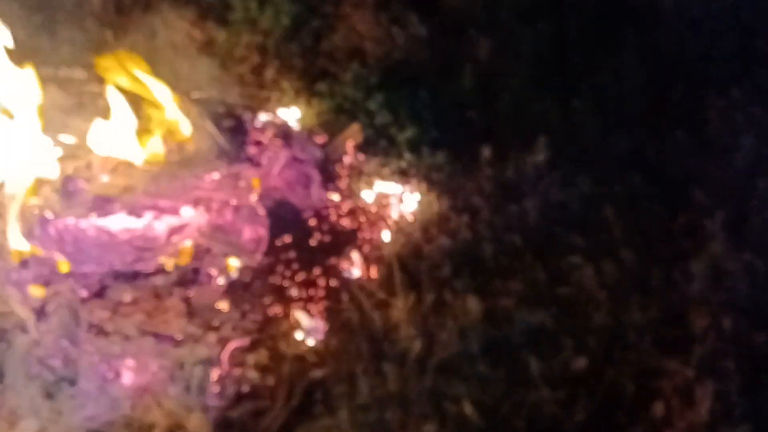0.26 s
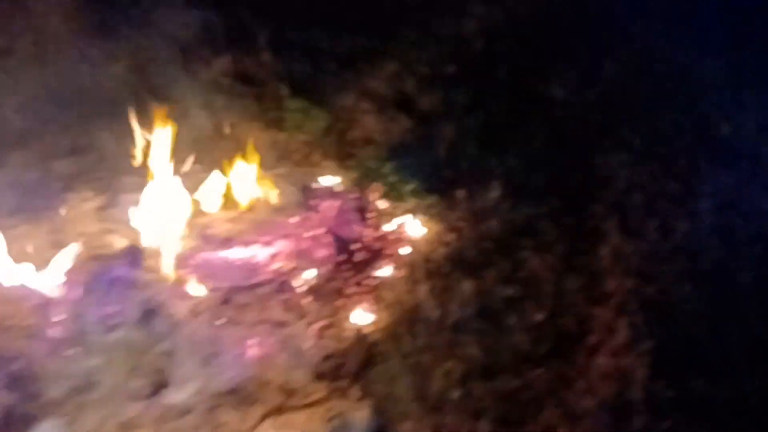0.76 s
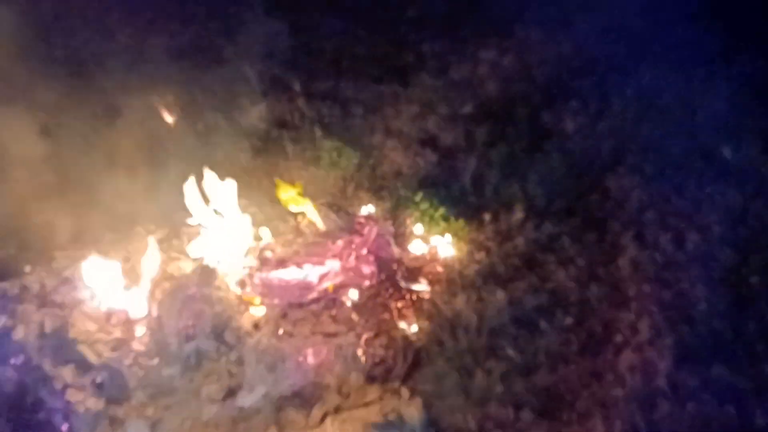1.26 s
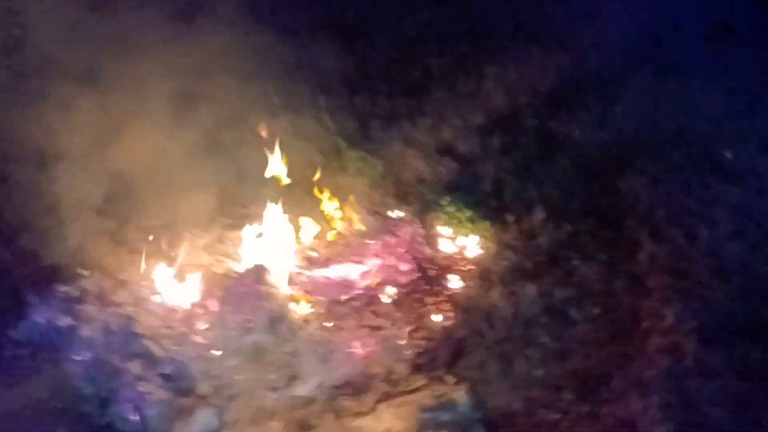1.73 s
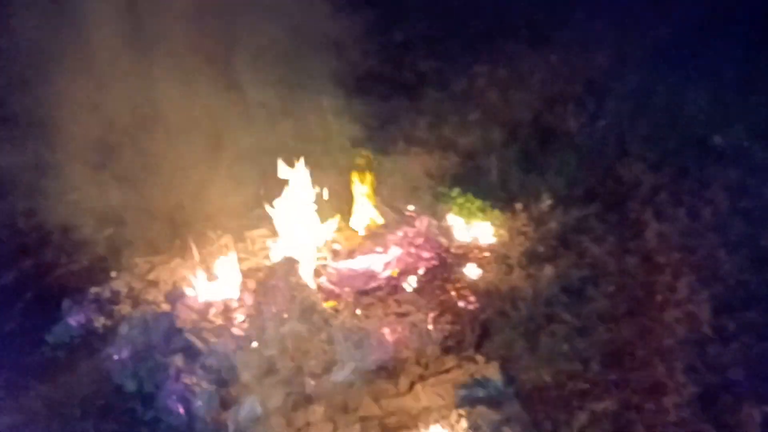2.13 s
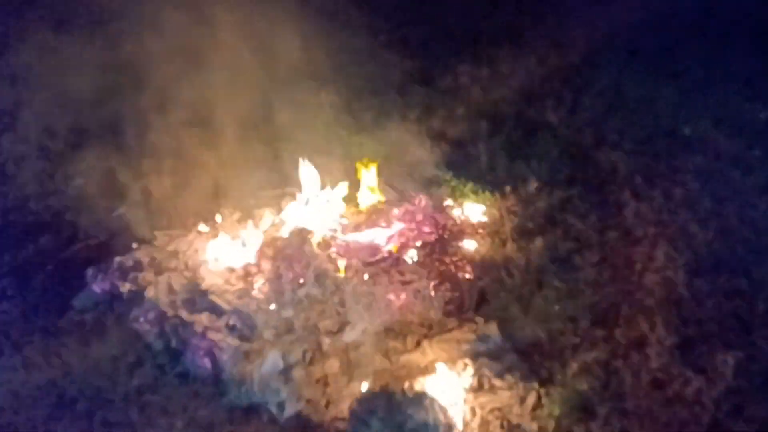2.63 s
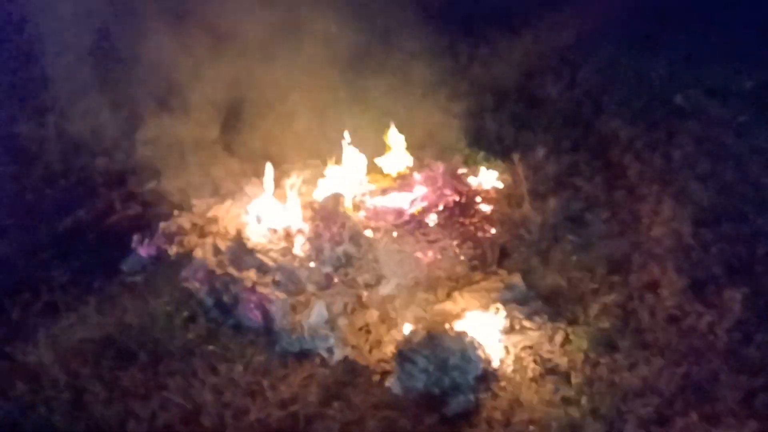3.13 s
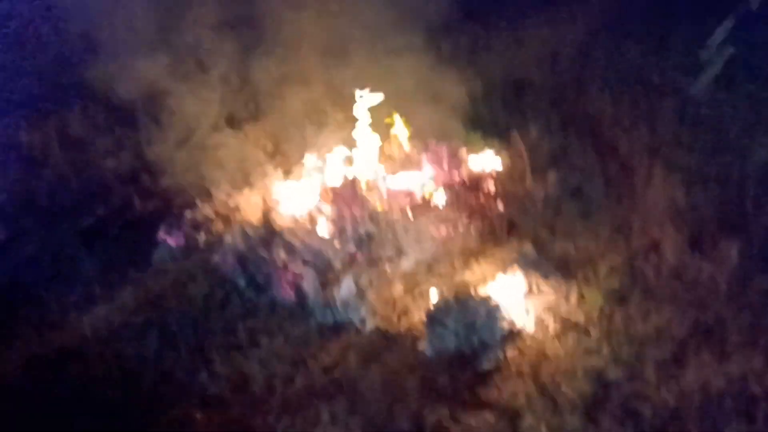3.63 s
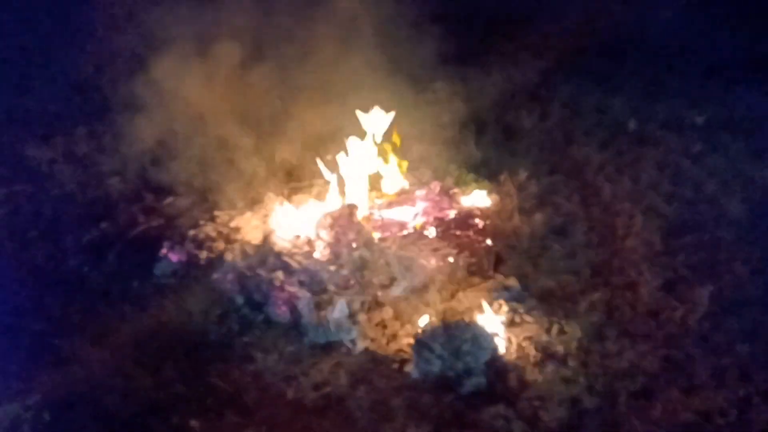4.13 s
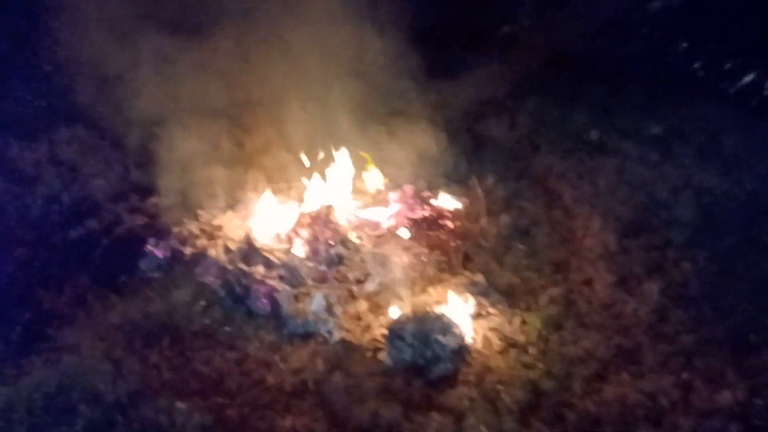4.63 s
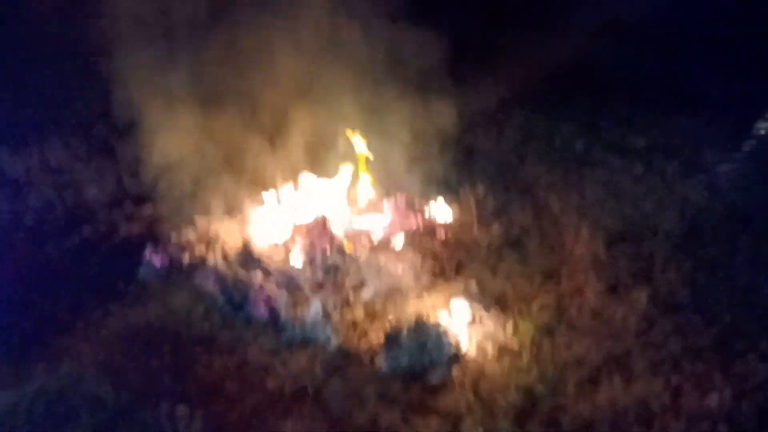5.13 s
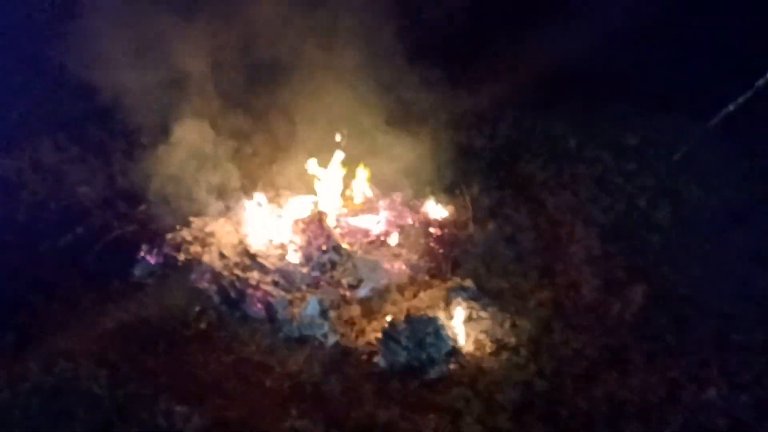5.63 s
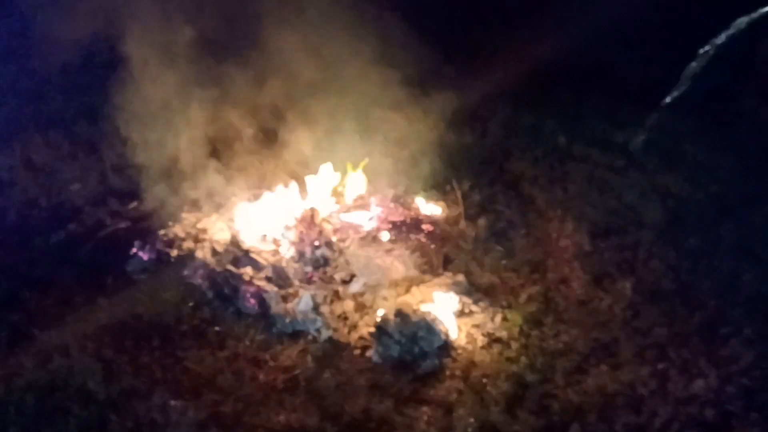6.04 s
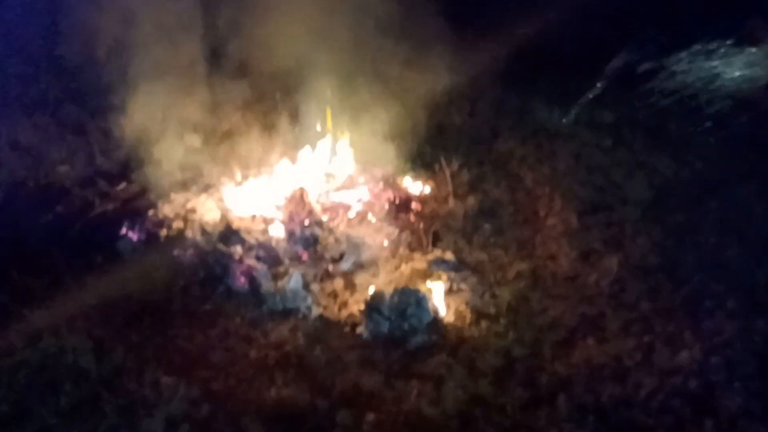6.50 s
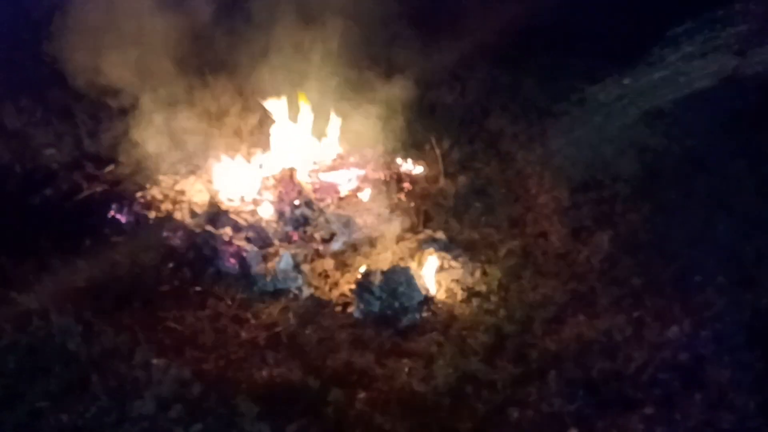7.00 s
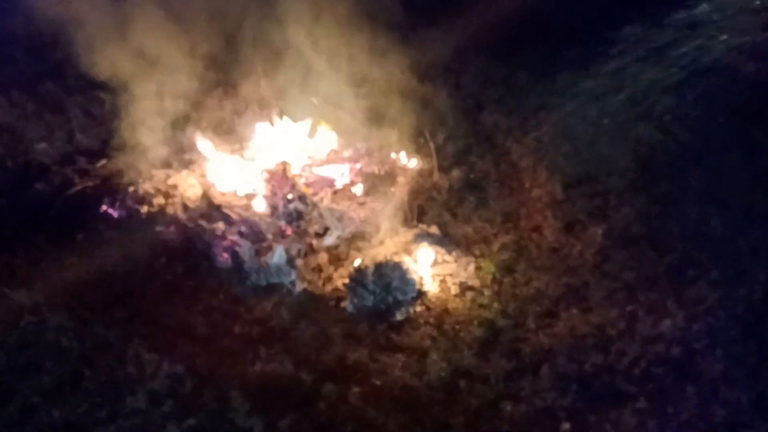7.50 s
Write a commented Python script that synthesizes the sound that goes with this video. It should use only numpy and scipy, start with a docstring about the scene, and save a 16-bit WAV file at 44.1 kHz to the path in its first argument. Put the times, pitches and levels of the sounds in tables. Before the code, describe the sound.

Steam hisses and sputters on a crackling fire of paper and dry grass, over low rushing flames and a far-off engine throb.

```python
"""A heap of paper, cardboard and dry grass burns outdoors at night while hose water sizzles on its edge.
From the start, steam hisses in bursts, mostly right of a moving two-port microphone, over the rush of
the flames; far off, exhaust pulses ring a big engine's pipe and a frog peeps. After a second, pops and
snapping stalks crowd in. Near 3 s a distant vehicle speeds up. Then the pops thin out, the sizzle drifts
toward the centre and more frogs peep, until the vehicle slows and the big engine fades away."""
import sys
import numpy as np
from scipy import signal
from scipy.fft import rfft, irfft
from scipy.io import wavfile
from scipy.ndimage import uniform_filter1d

SR = 44100
rng = np.random.default_rng(int(sys.argv[2]) if len(sys.argv) > 2 else 0)


def log_audio(samples):
    """Write samples as a 16-bit WAV file to the path given in sys.argv[1]."""
    # one column per channel
    frames = np.atleast_2d(samples).T
    # limit to full scale, then quantise
    limited = np.clip(frames, -1, 1)
    pcm = np.round(limited * 32767).astype(np.int16)
    wavfile.write(sys.argv[1], SR, pcm)


N = 342216

# Spectrum of the steam hiss and of the pops' crisp top: frequency_hz, density_db
FIZZ = [(350, 0), (700, -2), (1060, -2), (1500, 1), (2220, -1), (3360, -1), (3810, -1), (4700, 0.5),
        (5600, -2), (6600, -4.5), (8000, -2.5), (10000, -0.5), (12600, 5.5), (15100, -3), (16800, -4)]


def amp(db):
    """Decibels as an amplitude ratio."""
    return 10 ** (np.asarray(db) / 20)


def unit_rms(x):
    """Normalisation to a mean power of one."""
    return x / np.sqrt(np.mean(abs(x) ** 2) + 1e-20)


def at_hz(points, hz):
    """Interpolation on a logarithmic frequency axis."""
    knots_hz, value = np.transpose(points)
    return np.interp(np.log(hz + 1), np.log(knots_hz + 1), value)


def curves(rows, t):
    """Linear interpolation of each column over time."""
    time_s, *columns = np.transpose(rows)
    return [np.interp(t, time_s, column) for column in columns]


def add(mix, start_s, sound):
    """Superposition of a sound on the mix."""
    part = mix[:, round(start_s * SR):][:, :sound.shape[1]]
    part += sound[:, :part.shape[1]]


def resonate(x, hz, width_hz):
    """Resonance of unit gain by heterodyning: shift hz down to zero, smooth, shift back."""
    carrier = np.exp(2j * np.pi * np.cumsum(hz * np.ones(len(x))) / SR)
    pole = np.exp(-np.pi * width_hz / SR)
    return 2 * (carrier * signal.lfilter([1 - pole], [1, -pole], x / carrier + 1e-18)).real


def ports(near, other, hz, gap_db, late_ms, focus=1):
    """Acoustic shadow and path difference: the left port is shaded, delayed and partly coherent."""
    shadow = [(300, .01), (1300, 0.11), (2400, 0.23), (4400, 0.6), (8000, 0.79), (15000, 1.8)]  # weight of the left-minus-right gap: frequency_hz, weight
    coherence = [(500, .85), (1500, 1), (4000, 1), (8000, .97), (14000, .93)]  # likeness of the aligned ports: frequency_hz, coherence
    alike = np.clip(focus * at_hz(coherence, hz), 0, 1)
    left_gain = amp(gap_db * at_hz(shadow, hz))
    delayed = near * np.exp(-2j * np.pi * hz * late_ms / 1000)
    left = left_gain * (alike * delayed + np.sqrt(1 - alike ** 2) * other)
    return np.array([left, near]) * 2 / np.sqrt(1 + left_gain ** 2)


def sizzle():
    """Amplitude-modulated noise: steam hisses in puffs while stalks crackle and dry grass ticks."""
    # Hiss between bursts: time_s, level_db, body_db, edge_db (the last two before weighting)
    hiss = [(0.0, -58, -2, 5), (.06, -54.5, -1, 9), (.3, -51.5, -3, -8), (.85, -54.5, -2, 13),
            (1.3, -49, 2, -6.5), (1.55, -49.5, 1, -18), (2.0, -47, -6, 3), (2.45, -41.5, -2, -13.5),
            (2.65, -47.5, -1.5, -24.5), (3.3, -47.5, -2.5, 1.5), (3.6, -54, 2, -13.5),
            (3.9, -56.5, -2, -10), (4.1, -56, -5.5, -13), (4.4, -57.5, -7, -7), (4.75, -52, 0.5, -1.5),
            (5.38, -57, -14.5, 5), (5.9, -54.5, -8.5, 45), (6.3, -53, -12, 31), (6.7, -56, -10, 25),
            (6.95, -51.5, 3.5, -16), (7.2, -53, -10.5, -2), (7.76, -52, -4.5, 2)]
    body_weight = [(700, 1.5), (1200, 2.04), (2800, 0.84), (4500, 0.0048)]  # reach of the midrange lift: frequency_hz, weight
    edge_weight = [(2800, 0.33), (4500, 0.17), (6000, 0.092), (9000, 0.0082)]  # reach of the lift that extends into the treble: frequency_hz, weight
    # Direction of the hiss, drifting and at times jumping as another source takes over:
    # time_s, left_delay_ms, treble_gap_db (left minus right), focus
    direction = [(0, .57, -27, .5), (.09, .55, -28, .4), (.1, -.075, 4, 1), (.15, -.07, -2, .8),
                 (.17, .33, -18, .4), (.7, .33, -16, .45), (.95, .33, -14, .7), (1.25, .35, -13, .75),
                 (1.4, .36, -13, .35), (1.6, .41, -13, .75), (2.2, .49, -11.5, .9), (2.9, .35, -6.5, .7),
                 (3.1, .38, -4.5, .9), (3.44, .29, -8, .3), (3.8, .15, -5, .6), (4.5, .15, -6.5, .7),
                 (4.64, .1, -4, .3), (4.68, .03, -1, .6), (4.86, .03, -1, .5), (4.94, .21, -4.5, .8),
                 (5.35, .2, -4, .85), (5.55, .165, -4, .95), (5.95, .155, -3, .92), (6.2, .14, -3, .8),
                 (6.6, .092, -2.5, .85), (6.78, .11, -4, .7), (6.9, .11, -4, .3), (6.92, .39, -4.5, .35),
                 (7.76, .38, -4.5, .5)]
    long_puffs = sputter(per_s=16, spread_db=-5, t60_s=.84, rise_s=.00027)
    short_puffs = sputter(per_s=250, spread_db=1, t60_s=.0071, rise_s=.00078)
    puffs = unit_rms(.53 + .43 * long_puffs + .47 * short_puffs)
    noise = rng.standard_normal((2, N))
    ticks = impulses(per_s=400, spread_db=3.4, limit=2) * np.sign(noise)
    tick_band = signal.butter(1, [2000, 13000], "band", fs=SR, output="sos")
    source = amp(-9.5) * puffs * unit_rms(signal.sosfilt(tick_band, ticks))
    for band_hz in [(300, 1800), (1800, 3400), (3400, 6000), (6000, 10000), (10000, 20000)]:
        register = signal.sosfiltfilt(signal.butter(2, band_hz, "band", fs=SR, output="sos"), noise)
        crackle = sputter(per_s=240, spread_db=3.8, t60_s=.0055, rise_s=.00068)
        source += register * (puffs + amp(-13.5) * crackle)
    hz, t, (near, other) = signal.stft(unit_rms(source), SR, nperseg=256, noverlap=192)
    hz = hz[:, None]
    level_db, body_db, edge_db = curves(hiss, t)
    late_ms, gap_db, focus = curves(direction, t)
    burst_db, extra_body_db = steam_bursts(t)
    flicker_db = 1.53 * patches(rng.standard_normal(near.T.shape).T, bins=8, frames=14)
    colour = amp(at_hz(FIZZ, hz))
    colour /= np.sqrt(np.mean(colour ** 2 * (hz > 7000)))  # normalised by its treble
    lift_db = at_hz(body_weight, hz) * (body_db + extra_body_db) + at_hz(edge_weight, hz) * edge_db
    gain = colour * amp(level_db + burst_db + lift_db + flicker_db)
    pair = gain * ports(near, other, hz, gap_db, late_ms, focus)
    return signal.istft(pair, SR, nperseg=256, noverlap=192)[1][:, :N]


def steam_bursts(t):
    """Flash boiling on embers: gain and body lift as the hiss chokes, leaps, holds and falls."""
    # Water landing on embers: start_s, length_s, gain_db, body_db (before weighting), choke_db
    landings = [(0.083, 0.056, 2, 4, 3), (0.254, 0.029, -3, -6, 6), (0.47, 0.26, 4, 2.5, 1),
                (0.542, 0.032, -0.5, 2.5, -1), (0.605, 0.026, 4, 1, 1), (0.641, 0.04, -0.5, 2, -2),
                (0.93, 0.045, 5.5, -0.5, 0), (1.09, 0.2, 3, 0.5, -1), (1.329, 0.32, 1.5, -0.5, 3),
                (1.335, 0.079, 0.5, 1, 0.5), (1.461, 0.018, 6.5, 0.5, -5.5), (1.556, 0.014, -5.5, 1, 8),
                (1.585, 0.037, 4.5, -2.5, 5), (1.645, 0.1, 8, 1.5, 6), (1.795, 0.081, 5.5, 3.5, -6),
                (1.896, 0.28, 5.5, 3.5, -1), (2.19, 0.089, 0, 0, 3), (2.283, 0.026, 4.5, 1, -0.5),
                (2.335, 0.056, 5, 2.5, 8), (2.471, 0.086, 6, 3.5, 1.5), (2.619, 0.022, 0.5, 2.5, 9),
                (2.701, 0.038, 8.5, 3, 2.5), (2.878, 0.2, 5.5, -1, -1), (3.083, 0.094, 4, 4, -1),
                (3.181, 0.02, 2, 1.5, 5), (3.455, 0.073, 6, 0, -3), (3.658, 0.077, 3.5, 2.5, -2),
                (3.79, 0.023, 4.5, 0, -2), (3.972, 0.094, 3.5, 4, -6), (4.49, 0.085, -2, 5, -4.5),
                (4.611, 0.013, 3, 0, 8), (4.671, 0.0067, 1.5, 2, -1), (4.711, 0.026, -6, -3, 9),
                (4.762, .012, -5, -7, 2), (4.818, 0.075, 4, -3, 3), (4.929, 0.024, 2.5, 4, 1),
                (4.984, 0.2, 3.5, 4, 2), (5.317, 0.018, -1.5, -2, 6), (5.501, 0.2, 4, 1, 1),
                (5.767, 0.062, 1, 4, 0), (6.036, 0.078, 3, 3, -1), (6.417, 0.27, 3, 5, -4),
                (6.458, 0.11, 2.5, -2, -3), (6.541, 0.13, 2.5, 3, -3), (6.727, 0.098, 3.5, 3, 3),
                (6.95, .06, -0.5, 0, -1), (7.64, 0.11, 0.5, 1, -1)]
    rise_s, fall_s, choke_s = .0024, .047, .014
    start_s, length_s, gain_db, body_db, choke_db = np.transpose(landings)[:, :, None]
    age_s = t - start_s
    envelope = np.clip(np.minimum(age_s / rise_s, 1 + (length_s - age_s) / fall_s), 0, 1)
    choke = np.clip(3 * (age_s + choke_s) / choke_s, 0, 1) * np.clip(1 - age_s / rise_s, 0, 1)
    return (gain_db * envelope - choke_db * choke).sum(0), (body_db * envelope).sum(0)


def impulses(per_s, spread_db, limit):
    """Poisson process: impulses at random times, with random levels up to limit times the spread."""
    return amp(spread_db * np.minimum(rng.exponential(1, N), limit)) * (rng.random(N) < per_s / SR)


def sputter(per_s, spread_db, t60_s, rise_s):
    """Shot noise as an envelope: random puffs swell and decay exponentially."""
    kicks = impulses(per_s, spread_db, limit=3.6)
    swelling = signal.lfilter([1], [1, -np.exp(-1 / rise_s / SR)], kicks)
    return unit_rms(signal.lfilter([1], [1, -amp(-60 / t60_s / SR)], swelling))


def patches(noise, bins, frames):
    """Correlated fluctuation: a moving average of noise over frequency and time."""
    return unit_rms(uniform_filter1d(uniform_filter1d(noise, bins, axis=0), frames, axis=1))


def pops():
    """Damped resonance: a brief noise burst drives one mode and adds a crisp top; loud pops also thud."""
    # Pops in the heap: time_s, peak_db, ring_hz, treble_gap_db (left minus right)
    events = [(.103, -32, 1910, -2), (0.1122, -24, 2400, 5), (0.119, -23, 2720, 5), (0.136, -39, 1500, -2),
              (0.152, -29, 7540, -1), (.2711, -32, 6120, -28), (0.363, -36, 11670, -21),
              (.5055, -33, 3180, -11), (0.804, -26, 4000, -21), (.942, -32, 2640, -18),
              (1.115, -25, 4250, -18.5), (1.14, -23.5, 12000, -10.5), (1.161, -26, 1620, -15.5),
              (1.181, -28, 1260, -15), (1.1993, -24.5, 13400, -10), (1.216, -31, 11500, -5),
              (1.228, -26, 12000, -13), (1.3422, -37, 4700, -20), (1.3612, -22, 11000, -25),
              (1.485, -22.5, 12000, -17), (1.5598, -29, 13610, -17), (1.5944, -46, 5000, -14),
              (1.65, -36, 4790, -12), (1.676, -28, 3800, -6), (1.713, -23, 12620, 2.5),
              (1.714, -20.5, 4460, -5), (1.8162, -26, 2800, -15), (1.823, -23, 10770, -12),
              (1.831, -22, 4500, -15), (1.861, -24, 6000, -13), (1.896, -18, 14000, -26),
              (1.952, -29, 4200, -8), (1.99, -25, 3000, -17), (2.006, -26, 2750, -19),
              (2.015, -27, 7500, -14), (2.0339, -24.5, 1270, -2), (2.0503, -22.5, 7000, -12.5),
              (2.0684, -34, 800, -20), (2.06, -37, 3500, -14), (2.077, -21.5, 2630, -19),
              (2.085, -22.5, 3300, -20), (2.1214, -31, 2520, -20), (2.1292, -22.5, 4500, -21),
              (2.171, -22, 4930, -19), (2.179, -16, 12900, -8), (2.2294, -28, 7500, -10),
              (2.2441, -27, 6000, -6), (2.279, -30, 3000, -8), (2.295, -26, 2800, -5),
              (2.311, -22.5, 2280, -20), (2.3394, -25, 11000, -16), (2.382, -11, 4400, -15),
              (2.4865, -27, 5200, -9), (2.5152, -24, 5000, -20), (2.5213, -20, 12500, -23),
              (2.5317, -23, 6500, -15), (2.5322, -22, 1650, -21), (2.551, -14.5, 2000, -20.5),
              (2.566, -29, 7250, -23), (2.628, -21, 15000, -7.5), (2.6398, -30, 3500, -5.5),
              (2.7046, -35, 2000, -5.5), (2.783, -22.5, 7800, -4.5), (2.9428, -27.5, 4500, -2.5),
              (2.985, -21, 12000, -6), (3.022, -38, 2800, 1), (3.1224, -22, 13570, -8),
              (3.138, -29, 12000, -6), (3.148, -25, 12000, -3), (3.1556, -22, 4700, -2.5),
              (3.1843, -25, 11540, -7), (3.2, -23, 5560, -2), (3.204, -31, 4540, 10),
              (3.4333, -6.5, 13600, -16), (3.4355, -34.5, 643, -11), (3.4353, -36, 2140, -7),
              (3.802, -41.5, 3500, -7), (3.8182, -32.5, 13300, -16), (4.5248, -32.5, 580, -4),
              (4.631, -34, 2200, -7.5), (4.7654, -34, 5100, 6), (4.76, -32, 6150, 0),
              (4.7926, -26, 6640, 10.5), (4.89, -37, 586, -3), (4.913, -35, 2290, -5.5),
              (4.9944, -42, 9000, -10), (5.025, -29.5, 4200, -8.5), (5.0528, -37, 3500, 3.5),
              (5.2063, -38, 2500, -8), (5.2362, -31.5, 4310, -7), (5.3278, -30, 11460, -7),
              (5.399, -34, 7000, -8), (5.7704, -46, 3200, -1), (5.7831, -45, 2200, -11),
              (5.816, -31, 2120, -5), (5.823, -32, 2060, -2.5), (5.8492, -32, 13000, -23),
              (5.913, -37, 3000, -4), (5.9328, -42, 2790, 2), (5.9436, -34, 4900, -1.5),
              (5.961, -39, 2800, 0), (6.0603, -35, 2180, 3), (6.0707, -31, 1270, -4),
              (6.081, -33, 1800, -3), (6.0812, -29, 5200, -3.5), (6.099, -32, 5200, -2),
              (6.1066, -32, 2000, -2.5), (6.4641, -38, 3500, -4.5), (6.5514, -29, 3360, -3),
              (6.5668, -37, 5000, 2), (6.5875, -34, 4000, -5.5), (6.6229, -30, 2220, -6),
              (7.2782, -32, 5100, -2)]
    loud_db, damping, onset_s = -23, .6, .002
    out = np.zeros((2, N))
    t, hz = np.arange(2048) / SR, np.fft.rfftfreq(2048, 1 / SR)
    age_s = np.maximum(t - onset_s, 0)
    noises = rng.standard_normal((len(events), 2, len(t)))
    top = unit_rms(amp(at_hz(FIZZ, hz)) * np.clip((hz - 1200) / 6000, 0, 1))
    for (time_s, db, ring_hz, gap_db), noise in zip(events, noises):
        # Loud or low pops have less crisp top and hold one sharp blow.
        crisp = amp(1.5 - 2.6 * max(db - loud_db, 0) - 13 * max(np.log2(1500 / ring_hz), 0))
        blow_strength = max(1.4 - ring_hz / 4000, (db + 20) / 4, 0)
        rise_s = (.0004 + 2.2 / ring_hz) / 2.4  # lower modes build up more slowly
        tail = amp(-4 - 60 * age_s / .022) * (age_s > rise_s)
        envelope = age_s / rise_s * np.exp(1 - age_s / rise_s) + tail
        burst = rfft(noise * envelope)
        ratio = hz / ring_hz
        skirt = np.clip(ratio / .26, 0, 1)  # thins the ring far below its pitch
        mode = unit_rms(skirt * ratio / (1 - ratio ** 2 + 1j * damping * ratio))
        thud_gain = .052 * np.clip((db - loud_db) / 5, 0, 1) * abs(mode).max()
        thud = thud_gain * hz / (hz + 250) / (1 + 1j * hz / 2500)
        blow = blow_strength * np.linalg.norm(envelope) / (1 + (ratio / 2) ** 2)
        drive = burst + blow * np.exp(-2j * np.pi * hz * (onset_s + rise_s))
        ring = 2 * drive * (mode + thud) * np.sqrt(1.2 - min(crisp, 1) ** 2)
        near, other = ring + burst * crisp * top
        pair = irfft(ports(near, other, hz, gap_db, late_ms=-.024 * gap_db))
        peak = np.sqrt(uniform_filter1d(2 * (pair ** 2).sum(0), size=24).max())
        add(out, time_s - onset_s - rise_s, pair * amp(db) / peak)
    return out


def snaps():
    """Brittle fracture: a dry stalk emits a Gaussian pulse of a few cycles with a click at its centre."""
    # Breaking stalks: time_s, peak_db, pitch_hz, treble_gap_db (left minus right), click_ratio
    fractures = [(.3047, -36, 10500, -20, .6), (0.727, -35, 10100, -18, .6), (1.0595, -27, 11100, -16, .6),
                 (1.1358, -27, 12000, -16, .6), (1.2363, -22, 12500, -24, .4), (1.3576, -21, 13500, -3, 2),
                 (1.3631, -21, 7000, -3, 5), (1.4806, -18, 12600, -22, 0.67), (1.5, -25, 11400, -33, .6),
                 (1.5634, -22, 12300, -24, .6), (1.7262, -18, 12200, -22, .6),
                 (1.8427, -22, 12500, -18, .6), (1.847, -23, 7500, -17, 1.5), (1.8562, -24, 9500, -18, 1.5),
                 (1.9185, -24, 10000, -20, 1), (1.961, -24, 7000, -17, 2), (1.9665, -26, 5000, -15, 1.5),
                 (2.4124, -22, 11100, -20, .6), (2.5863, -24, 12200, -20, .6), (3.162, -24, 10400, -10, .6),
                 (3.404, -15.5, 12900, -20, .4), (3.439, -31, 11200, -20, .6), (4.064, -29, 11600, -15, .6),
                 (7.6952, -33, 12500, -10, .6)]
    half_length_s = .00012
    out = np.zeros((2, N))
    t, hz = (np.arange(256) - 128) / SR, np.fft.rfftfreq(256, 1 / SR)
    for time_s, db, pitch_hz, gap_db, click_ratio in fractures:
        phase, polarity = rng.random(2)
        ring = np.exp(-(t / half_length_s) ** 2) * np.cos(2 * np.pi * (pitch_hz * t + phase))
        click = click_ratio * np.sign(polarity - .5) * (t == 0)
        near = rfft(ring + click) * hz / (hz + 1500)
        pair = irfft(ports(near, near, hz, gap_db, late_ms=-.018 * gap_db))
        peak = np.sqrt(uniform_filter1d((pair ** 2).sum(0), size=8).max())
        add(out, time_s + t[0], pair * amp(db) / peak)
    return out


def flutters():
    """Narrow-band noise: the flames flutter in short, low, hollow rushes."""
    rushes = [(.69, 0.046, 215, 230, -44), (0.871, 0.2, 242, 248, -43.5), (1.168, 0.074, 250, 242, -51),
              (1.794, 0.076, 234, 232, -46), (2.25, .06, 230, 240, -47.5), (2.521, 0.097, 240, 240, -52),
              (2.911, .06, 222, 225, -46.5), (4.688, .08, 242, 219, -45.5), (5.56, .13, 250, 260, -45.5),
              (6.063, 0.047, 260, 260, -50)]  # flame flutters: start_s, length_s, first_hz, last_hz, level_db
    out = np.zeros((2, N))
    for start_s, length_s, first_hz, last_hz, db in rushes:
        hz = np.linspace(first_hz, last_hz, round(length_s * SR))
        rush = resonate(resonate(rng.standard_normal(len(hz)), hz, width_hz=72), hz, width_hz=71)
        rush = unit_rms(rush * signal.windows.tukey(len(hz), .5))
        add(out, start_s, amp(db) * np.array([rush, np.roll(rush, 18)]))
    return out


def roar():
    """Low-frequency noise of flames and far traffic in three registers; flares lift the upper two."""
    spectrum = [(15, -54), (25, -62), (45, -34), (80, -9.5), (98, -9.5), (120, 1), (145, -6), (175, -14),
                (215, -4), (245, -5), (290, -10.5), (346, -17), (473, -23.5), (535, -24), (1050, -34),
                (1600, -41), (2080, -93), (3520, -120)]  # the low rush: frequency_hz, density_db
    coherence = [(40, 0.4), (80, 0.91), (150, 0.89), (300, 0.88), (600, 0.25), (1200, 0.029)]  # likeness of left and right: frequency_hz, coherence
    lead = [(30, .3), (120, 0.25), (340, 0.86), (600, 0.041), (1200, .05)]  # phase lead of the left port: frequency_hz, lead_rad
    registers = [(0.0, -45.5, -47.5, -50), (.7, -44, -42.5, -43.5), (1.56, -41.5, -46, -45),
                 (2.5, -44.5, -44.5, -39.5), (3.33, -40.5, -44.5, -42), (4.13, -43, -53.5, -48.5),
                 (4.84, -45.5, -45, -42.5), (5.35, -47, -47.5, -44), (5.9, -47, -46.5, -41.5),
                 (6.6, -45, -49.5, -45), (7.1, -55.5, -50, -41), (7.5, -48, -47.5, -45.5),
                 (7.76, -54, -47, -40)]  # gains of the registers: time_s, low_db, mid_db, high_db
    flares = [(0.102, 0.14, 2.5), (0.967, 0.078, 7.5), (1.22, 0.2, 5), (1.844, 0.047, 5), (2.56, 0.19, 2),
              (4.25, 0.62, 5.5), (4.73, 0.08, -0.5), (5.18, 0.11, 5), (5.626, 0.37, 3.5), (6.54, 0.19, 7),
              (6.103, .08, 1), (6.84, 0.04, 1), (6.965, 0.12, 2), (7.287, 0.081, 2), (7.59, 0.11, 5)]  # flames flaring up: peak_s, half_length_s, gain_db

    def swell_db(hz, t):
        """Level over frequency and time, crossfaded between the registers."""
        low, mid, high = curves(registers, t)
        flare = sum(db * np.clip(1 - abs(t - peak_s) / half_s, 0, 1) for peak_s, half_s, db in flares)
        upper, top = np.clip((hz - 170) / 60, 0, 1), np.clip((hz - 340) / 120, 0, 1)
        return (1 - upper) * low + (upper - top) * (mid + flare) + top * (high + .93 * flare)
    return noise_field(spectrum, coherence, lead, swell_db, size=2048)


def noise_field(spectrum, coherence, lead, level_db, size):
    """Partly coherent noise at two ports, built from random short-time spectra at level_db(hz, t)."""
    hz = np.fft.rfftfreq(size, 1 / SR)[:, None]
    t = np.arange(4 * N // size + 5) * size / 4 / SR
    a, b, c, d, drift = rng.standard_normal((len(t), len(hz), 5)).T
    common, separate = a + 1j * b, c + 1j * d
    alike = np.clip(at_hz(coherence, hz), -1, 1)
    left = common * np.exp(1j * at_hz(lead, hz))
    right = alike * common + np.sqrt(1 - alike ** 2) * separate
    pair = np.array([left, right]) * amp(at_hz(spectrum, hz) + .8 * patches(drift, bins=10, frames=10))
    steady, shaped = (signal.istft(spectra, nperseg=size, noverlap=3 * size // 4)[1][:, :N]
                      for spectra in (pair, pair * amp(level_db(hz, t))))
    return shaped / np.sqrt(np.mean(steady ** 2))


def big_engine():
    """Pipe resonance: one main and two side exhaust pulses per cycle excite two modes."""
    exhaust = [(0, -47, -4.5), (.33, -48, -3.5), (.6, -42.5, -22), (1.2, -43.5, -17), (1.8, -42, -5),
               (2.4, -40, -9), (3, -39.5, -9), (3.95, -54, 1), (4.4, -44.5, -6.5), (4.9, -51.5, -5),
               (5.4, -47.5, -5), (6, -57, -9), (7.1, -58, -3), (7.76, -79, -6)]  # strength of the throb: time_s, level_db, side_pulse_db
    cycle_count = [(0, -.8), (.325, 1), (.868, 4), (1.362, 7), (1.705, 9), (2.5, 14), (3.15, 18),
                   (4.25, 25), (5.49, 33), (6.54, 39), (7.55, 45), (7.76, 46.2)]  # the engine's progress: time_s, elapsed_cycles
    pipe_hz, overtone_hz = 117.65, 222.1
    t = np.arange(N) / SR
    db, side_db = curves(exhaust, t)
    cycles = curves(cycle_count, t)[0]
    main, every = (np.diff(np.floor(k * cycles), prepend=-k) for k in (1, 3))
    pulses = (main + (every - main) * amp(side_db)) * amp(.9 * rng.standard_normal(N))
    first = resonate(resonate(pulses, pipe_hz, width_hz=18.6), pipe_hz, width_hz=18.6)
    second = resonate(resonate(pulses, overtone_hz, width_hz=22), overtone_hz, width_hz=22)
    return amp(db) * unit_rms(first) + amp(db - 10.5) * unit_rms(second)


def vehicle():
    """Frequency modulation: a tone follows the firing rate, wavering a little in pitch and level."""
    firing = [(1.2, 117.8, -52), (1.8, 117, -47), (2.6, 121, -46), (3, 127.9, -48), (3.3, 149.9, -40),
              (3.7, 164.1, -54), (4.4, 167.6, -48.5), (5.5, 163.7, -46), (6.15, 165.2, -54),
              (6.5, 150.2, -51), (6.9, 147.5, -67), (7.2, 143.3, -54)]  # speeding up and slowing: time_s, firing_hz, level_db
    t = np.arange(N) / SR
    hz, db = curves(firing, t)
    waver = unit_rms(signal.lfilter([1], [1, -.9997], rng.standard_normal((2, N))))
    phase = 2 * np.pi * np.cumsum(hz + .5 * waver[0]) / SR
    audible = (t > firing[0][0]) * (t < firing[-1][0])
    return amp(db + .88 * waver[1]) * audible * np.sin(phase)


def frogs():
    """Noise through a swept resonance: short, mostly rising peeps, husky from the distance."""
    calls = [(0.256, 0.2, 3100, 3100, -69.5), (3.914, 0.15, 2930, 3040, -84),
             (4.227, 0.17, 3070, 3250, -81), (5.087, 0.19, 3000, 3100, -74), (5.382, .07, 2980, 3020, -84),
             (6.83, 0.2, 3070, 3200, -77), (7.334, 0.19, 2890, 3310, -69)]  # frog calls: start_s, length_s, first_hz, last_hz, relative_db
    out = np.zeros((2, N))
    for start_s, length_s, first_hz, last_hz, db in calls:
        hz = np.linspace(first_hz, last_hz, round(length_s * SR))
        husk = unit_rms(resonate(rng.standard_normal(len(hz)), hz, width_hz=99))
        peep = 3 * husk * signal.windows.tukey(len(hz), .6)
        add(out, start_s, amp(db) * np.array([peep, np.roll(peep, 3)]))
    return out


def night_air():
    """Diffuse field: a faint steady hiss, nearly incoherent between the ports."""
    spectrum = [(410, -57), (700, 5.5), (1300, -24), (2080, -10.5), (2510, -22), (3010, 2), (3530, -12.5),
                (4960, 0), (6540, -19), (11700, -3.5), (14000, -6), (15400, -4), (16200, -11)]  # night background: frequency_hz, density_db
    return noise_field(spectrum, coherence=[(700, .2), (16000, .05)], lead=[(700, 0), (16000, 0)],
                       level_db=lambda hz, t: -58.5, size=1024)


def scene():
    """Superposition of the doused fire and its background at the two ports."""
    night = night_air()
    fire = sizzle() + pops() + snaps() + flutters() + roar()
    motors = big_engine() + vehicle()
    engines = np.array([motors, np.roll(motors, 18)]) * amp([[-.8], [.8]])  # earlier left, louder right
    return fire + engines + frogs() + night


def record(dry):
    """Band limiting: the whole sound is dulled above about 16 kHz."""
    cutoff_hz = 16050
    low_pass = signal.firwin(511, cutoff_hz, window=("kaiser", 9), fs=SR)
    return signal.oaconvolve(dry, low_pass[None], "same")


dry = scene()
out = record(dry)
log_audio(out)
```